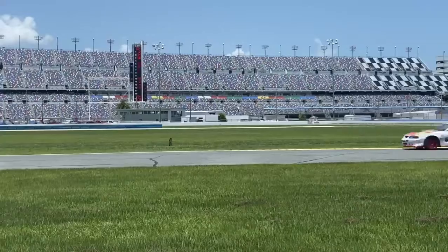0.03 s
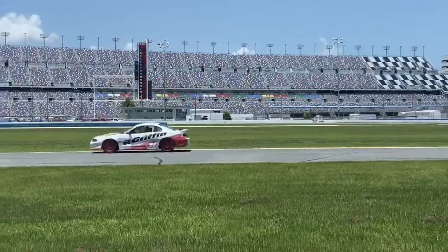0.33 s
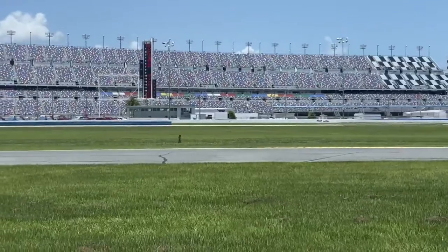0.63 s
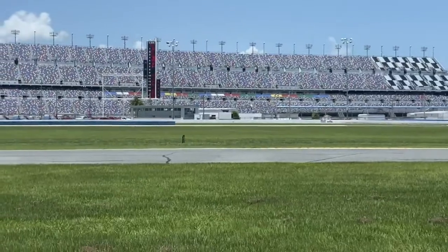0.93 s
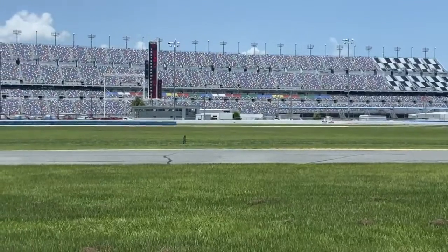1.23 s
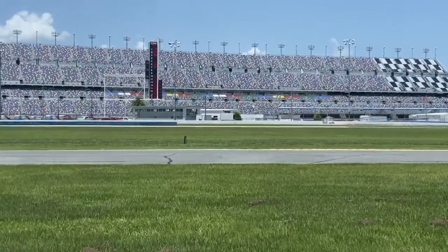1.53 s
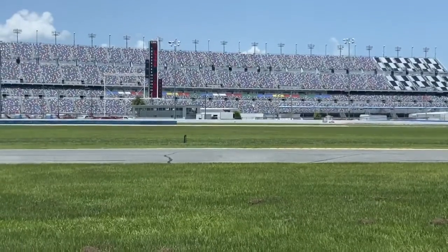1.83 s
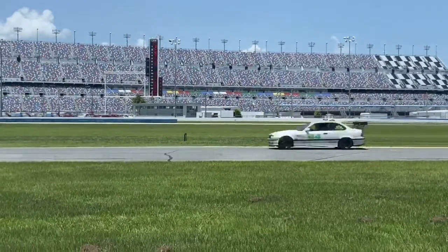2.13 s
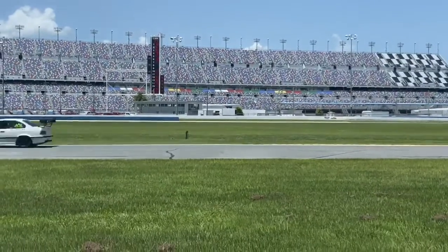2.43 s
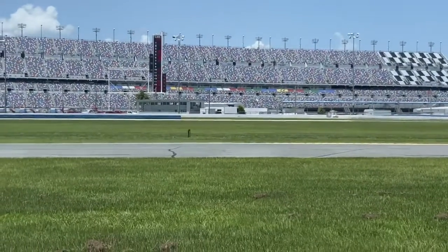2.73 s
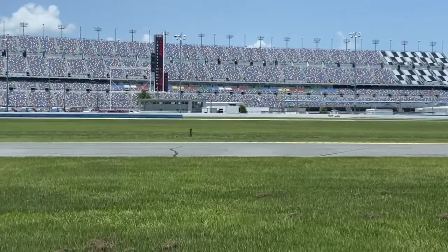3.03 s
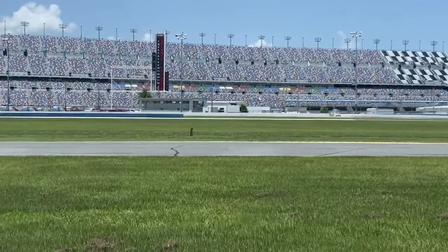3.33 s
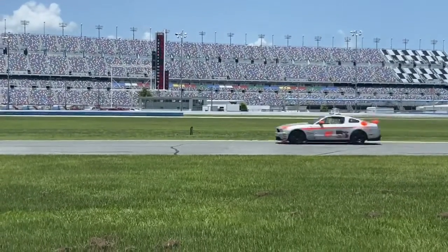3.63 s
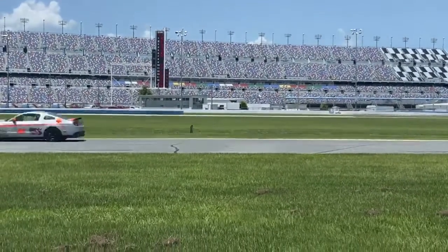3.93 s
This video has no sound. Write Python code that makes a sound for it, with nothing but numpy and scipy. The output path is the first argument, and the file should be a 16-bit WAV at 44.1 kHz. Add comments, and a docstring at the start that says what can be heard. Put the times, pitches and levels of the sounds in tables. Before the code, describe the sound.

Race cars speed past right to left, heard from the trackside grass: first a ragged, rasping engine, then a higher singing one that lifts off, then a deeper muffled one approaching. Wind buffets the microphone.

```python
"""Three race cars pass right to left at full speed, heard from the trackside grass: a ragged V8,
a singing six that lifts off once past, and a deeper, muffled six. Each exhaust sounds its engine
orders and a rasp of gas that cracks at every firing. Wind buffets a microphone pair that opens
abruptly on the first car; faint ticks and knocks lie underneath."""
import sys
import numpy as np
from scipy import signal
from scipy.fft import rfft, irfft
from scipy.io import wavfile

SR = 44100
rng = np.random.default_rng(int(sys.argv[2]) if len(sys.argv) > 2 else 0)


def log_audio(samples):
    """Write samples as a 16-bit WAV file to the path given in sys.argv[1]."""
    # one column per channel
    frames = np.atleast_2d(samples).T
    # limit to full scale, then quantise
    limited = np.clip(frames, -1, 1)
    pcm = np.round(limited * 32767).astype(np.int16)
    wavfile.write(sys.argv[1], SR, pcm)


N = 176400
T = np.arange(N) / SR
FREQS = np.maximum(np.arange(N // 2 + 1) * SR / N, 1)
OPENS_S = .0723
BASS_EDGE_HZ, TREBLE_EDGE_HZ = 450, 1900


def undb(db):
    """Decibels to gain."""
    return 10 ** (np.asarray(db) / 20)


def unit(x):
    """Scale to rms 1."""
    return x / np.sqrt(np.mean(x ** 2))


def curves(table):
    """Each column of a timed table, joined by straight lines."""
    times_s, *columns = np.array(table, float).T
    return [np.interp(T, times_s, column) for column in columns]


def response(points):
    """Level/dB at every frequency from (f/Hz, level/dB) points."""
    hz, db = np.array(points, float).T
    return np.interp(np.log(FREQS), np.log(hz), db)


def noise(colour):
    """Coloured noise, rms 1."""
    return unit(irfft(rfft(rng.standard_normal(N)) * undb(response(colour)), N))


def walk(rate_hz):
    """Smooth random drift, spread near 1."""
    knots = rng.standard_normal(2048)
    at = T * rate_hz
    i = at.astype(int)
    ease = .5 - .5 * np.cos(np.pi * (at - i))
    return knots[i % len(knots)] * (1 - ease) + knots[(i + 1) % len(knots)] * ease


def taps(events, colour, decay_s):
    """Decaying noise bursts at (t/s, level/dB) events."""
    return noise(colour) * sum(undb(db) * (T > s) * np.exp(-abs(T - s) / decay_s) for s, db in events)


def turns(pitch, waver, jitter_cycles):
    """Cycles elapsed at a pitch that includes Doppler; speed wavers, cycles come early or late."""
    rate_hz = curves(pitch)[0] * (1 + waver * walk(25))
    return np.cumsum(rate_hz) / SR + jitter_cycles * walk(160)


def turning(orders, facing_s):
    """Order levels/dB as the car turns from one aspect to the next."""
    return [(k, np.interp(T, facing_s, dbs)) for k, *dbs in orders]


def tones(phase, orders, flutter_db, spread_rad):
    """Exhaust orders, rms near 1, fluttering in moving air; a small phase spread keeps pulses sharp."""
    total, power = 0, 0
    for k, db in orders:
        drift_rad = spread_rad * (rng.standard_normal() + walk(7.6) / 2)
        gain = undb(db + flutter_db * walk(14))
        total = total + gain * np.cos(2 * np.pi * round(k) * phase + drift_rad)
        power = power + undb(db) ** 2
    return total * np.sqrt(2 / power)


def gas(phase, turbulence, puff_db, scatter_db, firings, harmonics):
    """Gas rasp: a pattern repeating each cycle plus turbulence, puffing and cracking at each firing."""
    partials = np.exp(2j * np.pi * rng.random(harmonics))
    partials[0] = 0
    pattern = irfft(partials, 8192)
    repeat = unit(np.interp(phase % 1, np.arange(len(pattern)) / len(pattern), pattern))
    firing = np.maximum(phase * firings, 0).astype(int)
    strength = undb(scatter_db * rng.standard_normal(4096))[firing]
    flow = np.sqrt(1 - turbulence) * repeat + np.sqrt(turbulence) * rng.standard_normal(N)
    puffs = flow * strength * undb(-puff_db * (phase * firings % 1))
    cracks = np.diff(firing, prepend=0) * strength ** 2
    return unit(puffs) + undb(-18) * unit(cracks)


def pipe(x, colours, facing_s):
    """Middle and treble bands, rms near 1 each, coloured by the side of the car that is heard."""
    low_cut = 1 / (1 + (BASS_EDGE_HZ / FREQS) ** 8)
    split = 1 / (1 + (FREQS / TREBLE_EDGE_HZ) ** 12)
    spectrum, middle, treble = rfft(x) * low_cut, 0, 0
    for colour, aspect in zip(colours, np.eye(len(facing_s))):
        share = np.interp(T, facing_s, aspect)
        shaped = spectrum * undb(response(colour))
        middle = middle + share * unit(irfft(shaped * split, N))
        treble = treble + share * unit(irfft(shaped * (1 - split), N))
    return middle, treble


def surge(x, depth_db, rate_hz):
    """Moving air swells and sinks each half octave of the rasp on its own."""
    octaves, spectrum = np.log2(FREQS / TREBLE_EDGE_HZ), rfft(x)
    centres_oct = np.arange(7) / 2
    bands = [irfft(spectrum * np.interp(octaves, centres_oct, row), N) for row in np.eye(7)]
    return unit(sum(band * undb(depth_db * walk(rate_hz)) for band in bands))


def drive_by(x, passes_s, speed_m_s=29, distance_m=31):
    """The nearer microphone port leads: right while the car comes, left as it leaves."""
    # side signal of a source fully to one side: f/Hz, level/dB
    port_side = [(100, -13), (350, -5), (700, 3), (1000, 4), (1400, 10), (1750, 5), (2150, -18),
                 (4000, -78)]
    along_m = speed_m_s * (T - passes_s)
    quadrature = irfft(1j * rfft(x * (T > OPENS_S)) * undb(response(port_side)), N)
    side = quadrature * along_m / np.hypot(along_m, distance_m)
    return np.array([x + side, x - side])


def ticks():
    """Faint dry ticks: bright noise bursts."""
    # onsets: t/s, level/dB
    events = [(2.727, -46), (2.982, -42.5), (3.027, -45)]
    return taps(events, [(800, -42), (2400, 6.5), (4000, -9), (7500, -8.5), (15000, -27)], decay_s=.018)


def knocks():
    """Soft dull knocks: low noise bursts."""
    # onsets: t/s, level/dB
    events = [(.663, -30), (3.493, -28)]
    return taps(events, [(250, -9), (600, 14), (2500, -31)], decay_s=.016)


def wind():
    """Wind on the microphone: fluttering rumble and short buffets, nearly alike on both ports."""
    # rumble: t/s, level/dB
    level = [(.1, -28), (.5, -30.5), (.65, -28.5), (.85, -34), (1.05, -31.5), (1.17, -21.5), (1.4, -22),
             (1.52, -24), (1.64, -18), (1.75, -23), (1.9, -21.5), (2.02, -34), (2.09, -38), (2.2, -35.5),
             (2.5, -26.5), (2.8, -27), (3.1, -29.5), (3.5, -24.5), (3.7, -27.5)]
    # buffets: t/s, length/s, level/dB
    buffets = [(2.738, 0.069, -35), (3.155, 0.098, -19.5), (3.521, 0.055, -19)]
    # spectra: f/Hz, level/dB
    rumble_colour = [(20, -33.5), (35, -19), (52, -2), (85, -3), (140, 0.5), (220, -8.5), (400, -15.5),
                     (700, -23.5), (5000, -64)]
    buffet_colour = [(25, -15), (70, 8), (200, 0.5), (330, 1), (600, -44), (1500, -49), (5000, -60)]
    swell = undb(curves(level)[0] + 1.8 * walk(30))
    gusts = 0
    for start_s, length_s, db in buffets:
        arch = np.sin(np.pi * np.clip((T - start_s) / length_s, 0, 1))
        gusts = gusts + undb(db) * np.sqrt(np.maximum(arch, 0))
    side = undb(-15) * swell * noise(rumble_colour)
    return swell * noise(rumble_colour) + gusts * noise(buffet_colour) + np.array([side, -side])


def muffled_six():
    """Last car: a deep drone, then sharp exhaust pops in limping threes as it draws level."""
    # cycle rate: t/s, f/Hz
    pitch = [(2.7, 52.13), (3.1, 50.86), (3.55, 51.77), (3.72, 51.03), (3.82, 49.95), (4, 48.92)]
    # bands: t/s, bass/dB, middle/dB, treble/dB
    levels = [(2.5, -70, -80, -90), (2.8, -31.5, -45, -57), (3.1, -29.5, -57.5, -53),
              (3.25, -27.5, -38.5, -47), (3.5, -29, -41.5, -44.5), (3.62, -23.5, -33, -38),
              (3.8, -23.5, -27, -40), (4, -20.5, -22.5, -36.5)]
    # drone: order, front/dB, abreast/dB
    orders = [(3, 4, -0.5), (5, -10.5, -4), (6, -3, 4.5), (12, -16, -10.5)]
    # three firings of the near bank: level/dB
    bank_db = [0, -3, -6]
    # rasp spectra: f/Hz, level/dB
    front = [(450, 3), (700, -7.5), (1400, -17), (2500, -22.5), (7500, -34), (15000, -56.5)]
    side = [(450, -1), (650, -11), (920, 5.5), (2000, -9), (2600, -13.5), (7500, -30), (15000, -34.5)]
    # front, side heard: t/s
    facing_s = [3.44, 4.035]
    phase = turns(pitch, waver=.001, jitter_cycles=.002) - .2
    bass, middle, treble = undb(curves(levels))
    firing = np.maximum(phase * len(bank_db), 0).astype(int)
    strength = undb(np.take(bank_db, firing, mode="wrap") + rng.standard_normal(N))
    pops = np.diff(firing, prepend=0) * strength
    bark, rasp = pipe(pops, [front, side], facing_s)
    roar, tyres = pipe(rng.standard_normal(N), [front, side], facing_s)
    boom = tones(phase, turning(orders, facing_s), flutter_db=3.5, spread_rad=1.16)
    crisp = np.interp(T, facing_s, [.5, .85])
    exhaust = np.sqrt(crisp) * bark + np.sqrt(1 - crisp) * roar
    top = undb(-5.5) * crisp * rasp + undb(-2) * tyres
    return drive_by(undb(-.5) * bass * boom + undb(-4) * middle * exhaust + treble * top, passes_s=3.89)


def ragged_v8():
    """First car: uneven firing sounds odd and even multiples of the cycle under a harsh rasp."""
    # cycle rate: t/s, f/Hz
    pitch = [(0, 55.04), (.13, 53.96), (.27, 53.1), (.36, 52.53), (.44, 50.55), (.55, 49.62), (.75, 46.4),
             (1.3, 42.96)]
    # bands: t/s, bass/dB, middle/dB, treble/dB
    levels = [(0.085, -16.5, -23.5, -17.5), (0.421, -16.5, -21.5, -22), (0.56, -29, -32.5, -46.5),
              (.63, -39, -48, -56), (.8, -29.5, -40.5, -45.5), (1.5, -36, -58, -49)]
    # boom: order, level/dB
    low_orders = [(2, 1.5), (3, 0), (4, -13), (5, -9), (6, -9), (7, -9.5), (8, -3.5)]
    # song and whine: order, early/dB, late/dB
    high_orders = [(10, -2, 2), (13, -10, -2), (14, -8, -9), (15, -5, -5), (20, -8, -7), (23, 0, -9),
                   (32, -3, -2), (37, -3, -9), (41, -13, -2), (46, 0, -11), (51, -2, -14)]
    # rasp spectra: f/Hz, level/dB
    early = [(400, -10), (800, -20), (1270, -12), (1500, -14.5), (2000, -10), (2550, 6), (3300, -2),
             (5000, -7.5), (7500, -19), (15000, -28.5)]
    late = [(400, 10), (700, 9), (1100, 4.5), (2150, -1.5), (2800, -4.5), (4900, -8.5), (7500, -20),
            (15000, -21)]
    # early, late aspect heard: t/s
    facing_s = [0.27, 0.31]
    phase = turns(pitch, waver=.00089, jitter_cycles=.0015)
    bass, middle, treble = undb(curves(levels))
    flow = gas(phase, turbulence=.38, puff_db=4, scatter_db=1.5, firings=8, harmonics=220)
    bark, rasp = pipe(flow, [early, late], facing_s)
    boom = tones(phase, low_orders, flutter_db=1, spread_rad=2)
    orders = turning(high_orders, facing_s)
    song = tones(phase, orders[:7], flutter_db=3, spread_rad=3)
    whine = tones(phase, orders[7:], flutter_db=3, spread_rad=2)
    body = undb(-2) * song + undb(-2.5) * bark
    top = undb(-.5) * surge(rasp, depth_db=2, rate_hz=20) + undb(-7) * whine
    return drive_by(undb(-2) * bass * boom + middle * body + treble * top, passes_s=.44)


def overrun(phase):
    """The singing six off throttle: a burble over a few engine orders."""
    # envelope: t/s, level/dB
    level = [(2.52, -58), (2.58, -33), (2.65, -28.5), (2.73, -32.5), (2.8, -44), (2.91, -49), (3.1, -71)]
    # hum: order, level/dB
    orders = [(8, -7), (9, 0), (13, -15), (17, -13), (23, -20)]
    # burble spectrum: f/Hz, level/dB
    colour = [(200, -5), (400, -4), (850, -3), (1200, -9), (2000, -17), (6000, -55)]
    hum = tones(phase, orders, flutter_db=2, spread_rad=1)
    burble = noise(colour) * undb(4.43 * walk(60) - 10.5)
    return undb(curves(level)[0]) * (burble + undb(-3) * hum)


def singing_six():
    """Second car, a straight six: clean orders and a scream coming, a tearing rasp abreast, then a lift."""
    # firing rate of one bank, the base of the orders here: t/s, f/Hz
    pitch = [(.5, 173.6), (.75, 177.2), (1, 180.3), (1.5, 184.2), (1.8, 184.1), (2, 181.3), (2.2, 177.3),
             (2.4, 171), (2.53, 168.4), (2.6, 162.2), (2.9, 156.9)]
    # bands: t/s, fundamental/dB, octave/dB, middle/dB, treble/dB
    levels = [(.3, -34, -53, -45, -70), (.62, -29, -42, -39.5, -49.5), (.85, -26, -36, -39.5, -44.5),
              (1.05, -25, -30.5, -33.5, -38), (1.17, -20, -23, -32, -33), (1.5, -20.5, -19, -23.5, -29),
              (1.6, -17, -30, -25.5, -24.5), (1.69, -16.5, -31, -22, -23.5),
              (1.79, -20.5, -15.5, -22.5, -24), (1.91, -18, -21.5, -19.5, -18.5),
              (2.03, -33, -39.5, -21, -17), (2.08, -38, -45, -24, -26.5), (2.16, -47, -24.5, -22, -25),
              (2.28, -29.5, -46, -20, -20), (2.42, -24.5, -23, -22, -28.5),
              (2.545, -23.5, -21.5, -25.5, -31.5), (2.58, -26, -52, -56, -49.5),
              (2.7, -33, -25.5, -48, -52.5), (3, -37, -62, -71, -87)]
    # song, front to rear: order, level/dB at each t/s of song_s
    song_orders = [(3, 0, 0, -2, -5, -1), (4, -11, 1, -6, 1, -3), (5, -7, -1, 2, 4, 0),
                   (6, -18, -3, -6, -10, -9), (7, -13, -2, -4, -5, -6), (9, -24, -14, -6, -6, -3),
                   (11, -23, -23, -18, -7, -11)]
    song_s = [1.52, 1.85, 2.01, 2.27, 2.5]
    # scream: order, level/dB
    scream_orders = [(12, -12), (13, -9), (14, 0), (16, -7), (17, -9), (18, -8)]
    # scream in the treble: t/s, power share
    scream_share = [(.7, .12), (1.5, .4), (1.85, .28), (2.15, .04)]
    # rasp spectra: f/Hz, level/dB
    front = [(600, 3.5), (1400, -18), (1920, -7.5), (2500, -1), (3700, -4), (4500, -6), (7500, -11),
             (15000, -29.5)]
    side = [(500, -5.5), (1500, -13), (1900, -14), (2500, -2.5), (4600, -0.5), (5700, -8), (7500, -10),
            (10000, -23), (15000, -23)]
    rear = [(500, -9), (900, 14), (1900, 4.5), (2560, -3.5), (3200, -4), (5000, -4.5), (7000, -12.5),
            (11000, -15.5), (15000, -16.5)]
    # front, side, rear heard: t/s
    facing_s = [1.38, 1.95, 2.57]
    phase = turns(pitch, waver=.0017, jitter_cycles=.006)
    fundamental, octave, middle, treble = undb(curves(levels))
    flow = gas(phase, turbulence=.5, puff_db=2.5, scatter_db=1.7, firings=2, harmonics=70)
    bark, rasp = pipe(flow, [front, side, rear], facing_s)
    rasp = surge(rasp, depth_db=2.8, rate_hz=32)
    song = tones(phase, turning(song_orders, song_s), flutter_db=2.2, spread_rad=1.7)
    boom = fundamental * tones(phase, [(1, 0)], flutter_db=1, spread_rad=.22)
    boom += octave * tones(phase, [(2, 0)], flutter_db=1, spread_rad=1)
    scream = tones(phase, scream_orders, flutter_db=3.3, spread_rad=2.6)
    share = curves(scream_share)[0]
    body = undb(.07) * song + undb(-7.5) * bark
    top = np.sqrt(share) * scream + np.sqrt(1 - share) * rasp
    flare_rms = undb(-29.5) * np.exp(-((T - 1.56) / .07) ** 2)  # order 16 flares on the approach
    flare = flare_rms * np.sqrt(2) * np.cos(2 * np.pi * 16 * phase)
    coast = overrun(phase / 3)  # three bank firings per engine cycle
    return drive_by(boom + middle * body + undb(1) * treble * top + flare + coast, passes_s=2.326)


def scene():
    """Three cars over wind, ticks and knocks."""
    return ragged_v8() + singing_six() + muffled_six() + wind() + ticks() + knocks()


def record(dry):
    """The pair opens abruptly, leans left in the mids, lags left in the top octave and cuts the top."""
    # left minus right: f/Hz, level/dB
    balance = [(100, .1), (550, .6), (750, 1.8), (1400, 2), (1750, 5), (2200, 0)]
    lag_from_hz, lag_turn_hz, top_hz = 7030, 4050, 15750
    fade_out = np.minimum((T[-1] - T) * SR / 256, 1)
    opened = dry * np.where(T > OPENS_S, 1, undb(-60)) * fade_out
    lag_rad = -2 * np.pi * np.maximum(FREQS - lag_from_hz, 0) / lag_turn_hz
    sides = np.array([[.5], [-.5]])
    ports = undb(sides * response(balance)) * np.exp(1j * sides * lag_rad)
    heard = irfft(rfft(opened) * ports, N) * np.minimum(T / OPENS_S, 1)
    return signal.sosfilt(signal.ellip(10, .2, 80, top_hz, fs=SR, output="sos"), heard)


dry = scene()
out = record(dry)
log_audio(out)
```